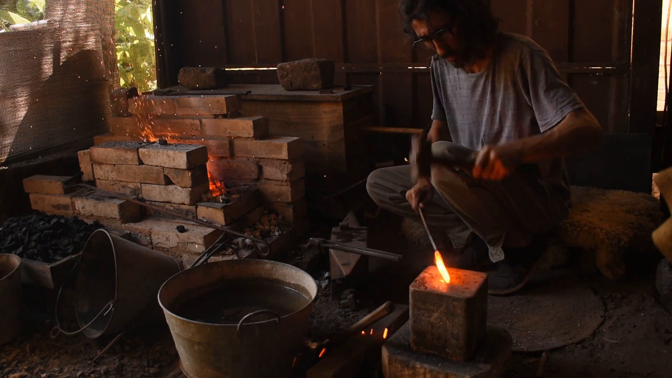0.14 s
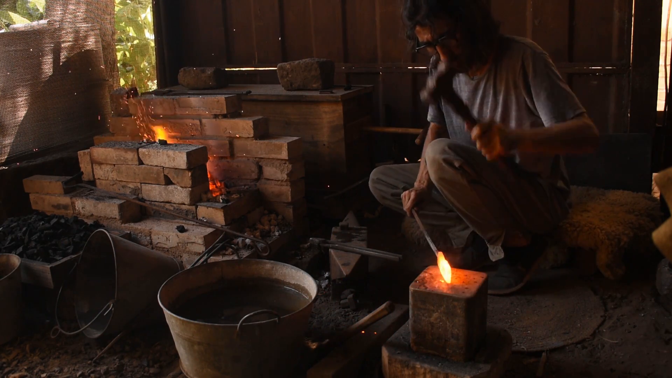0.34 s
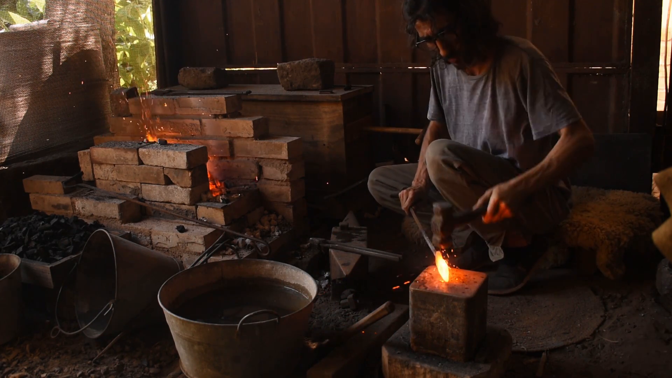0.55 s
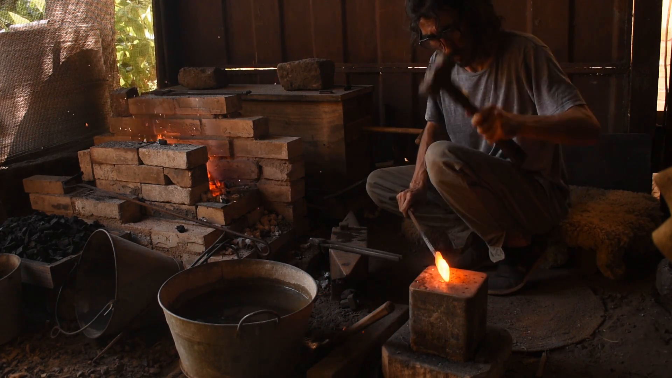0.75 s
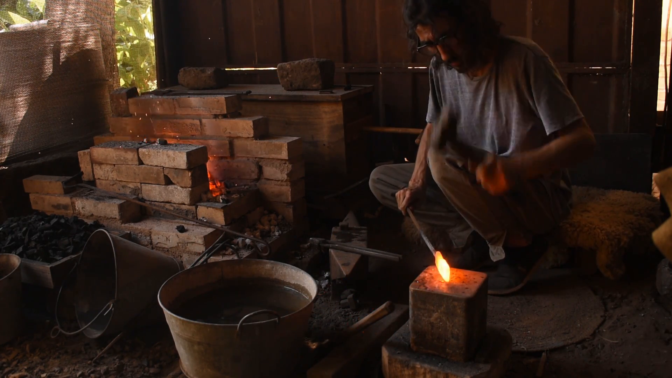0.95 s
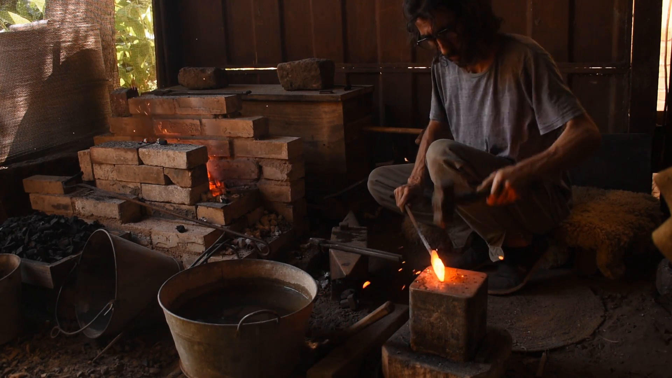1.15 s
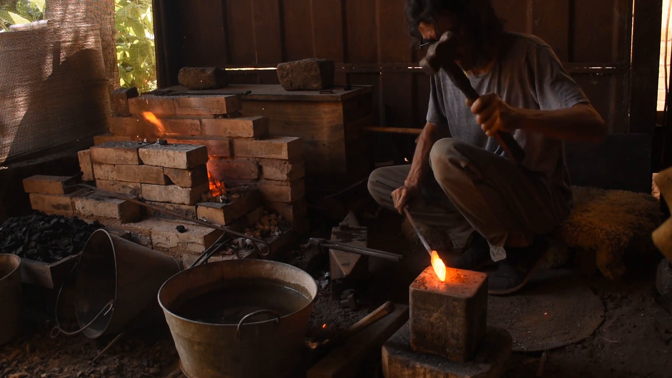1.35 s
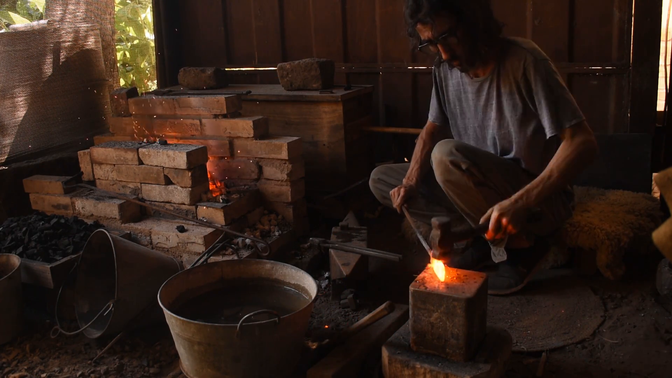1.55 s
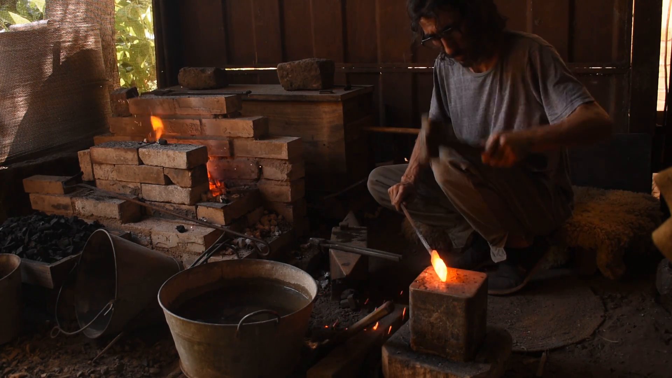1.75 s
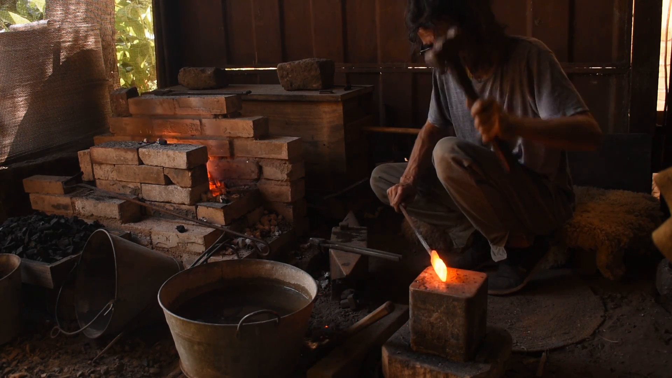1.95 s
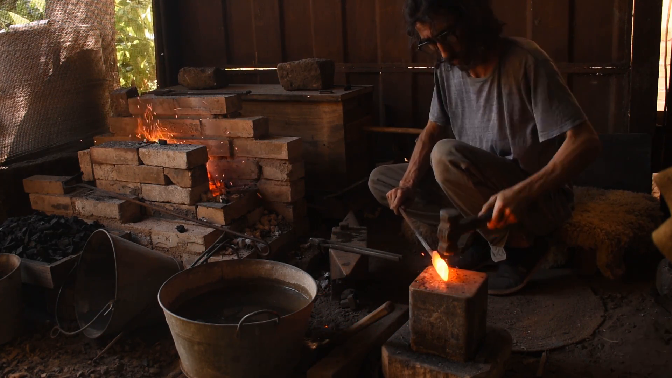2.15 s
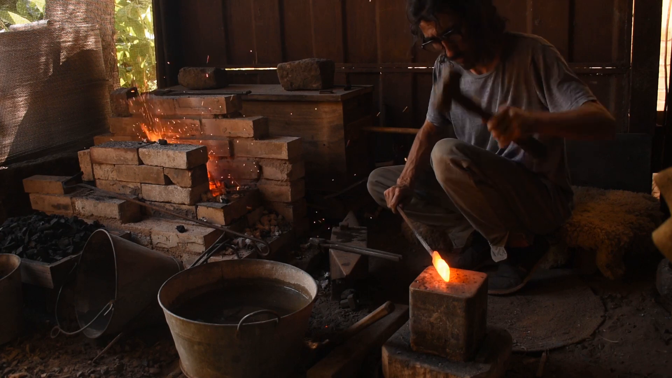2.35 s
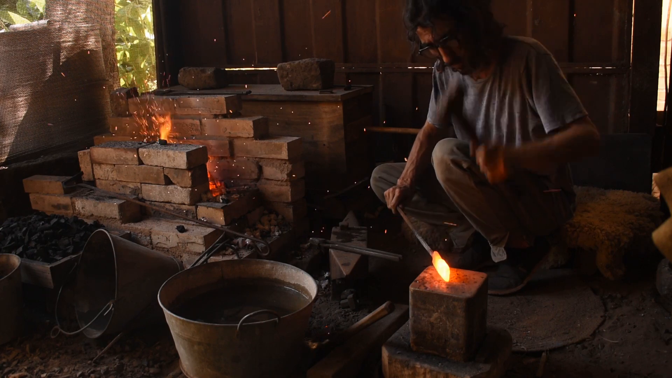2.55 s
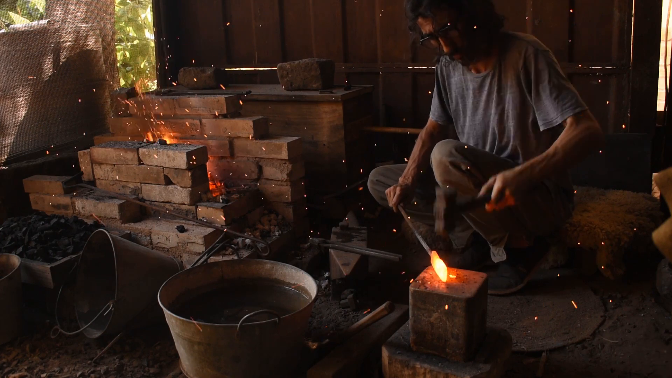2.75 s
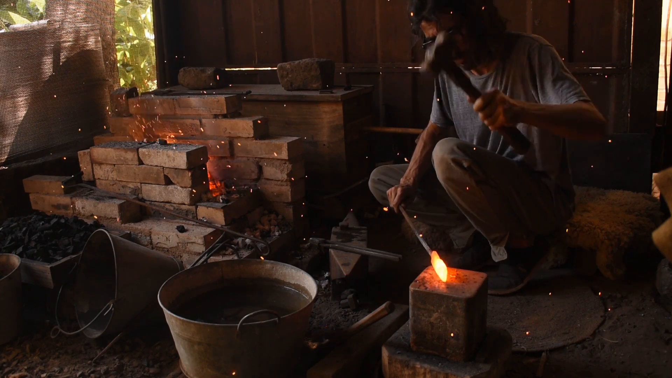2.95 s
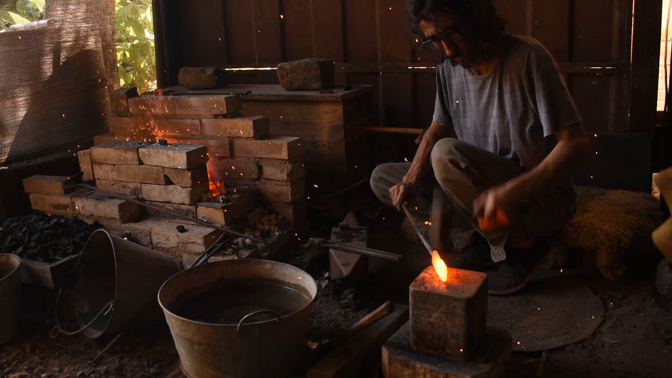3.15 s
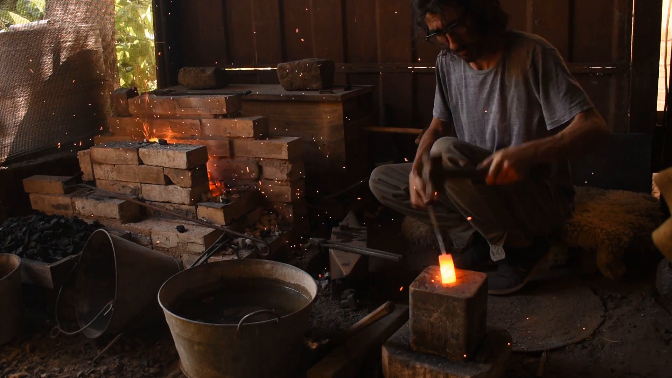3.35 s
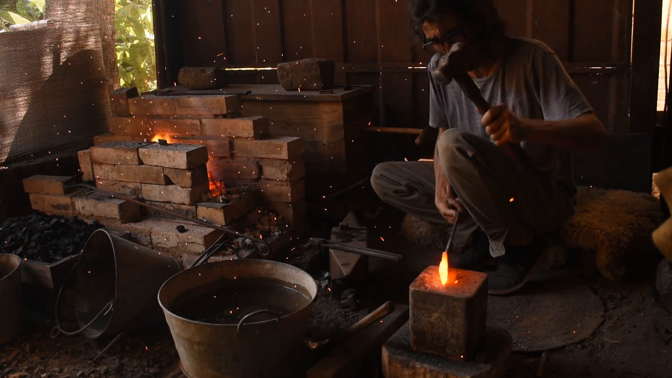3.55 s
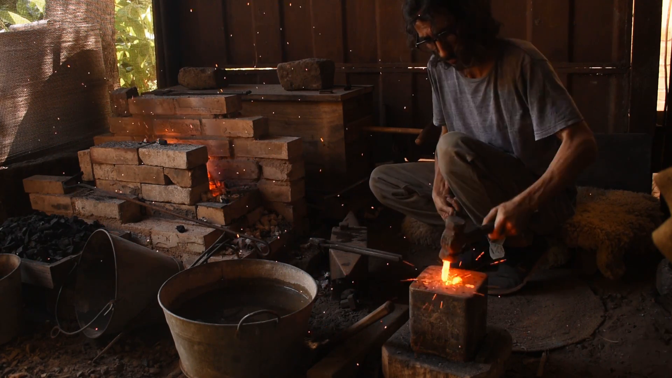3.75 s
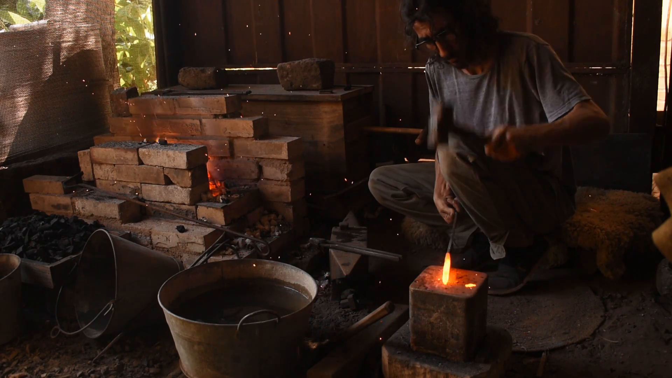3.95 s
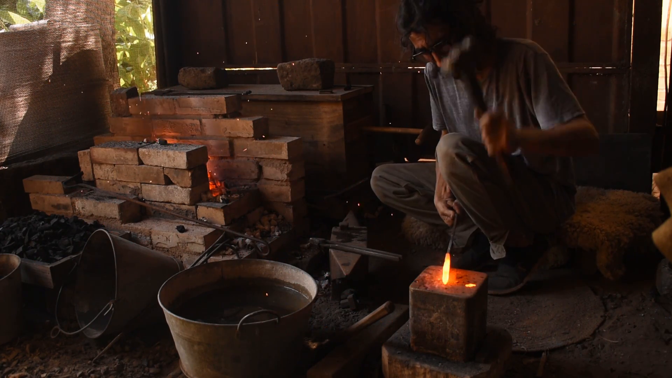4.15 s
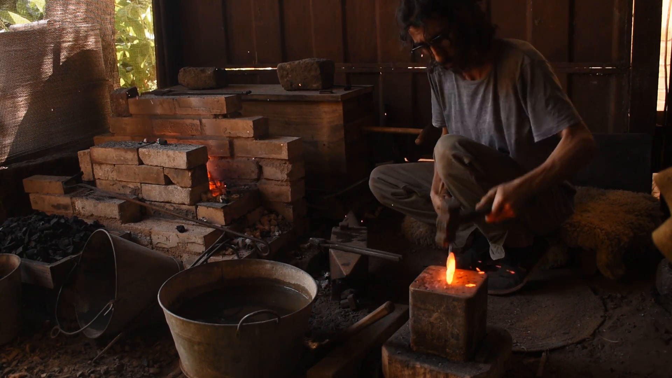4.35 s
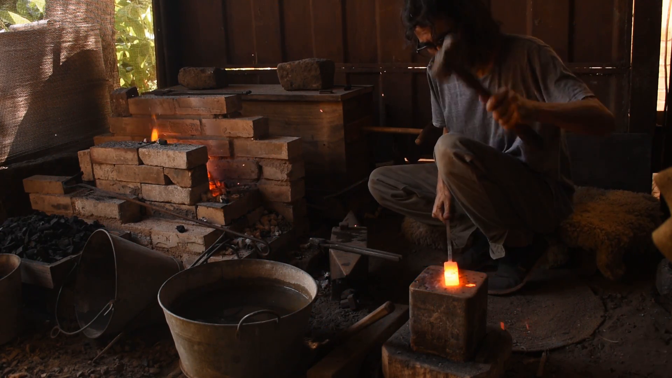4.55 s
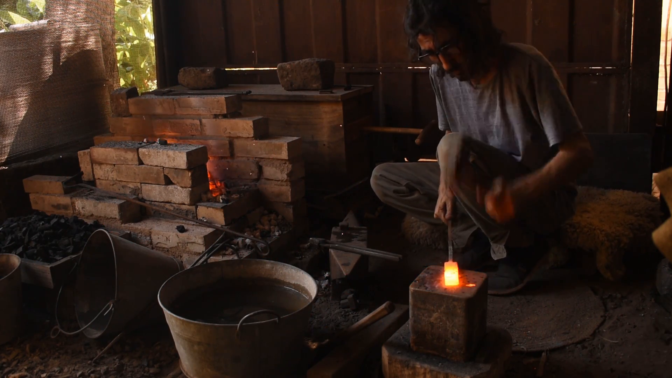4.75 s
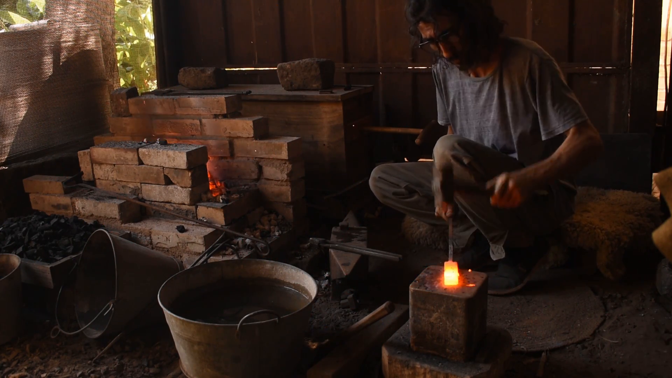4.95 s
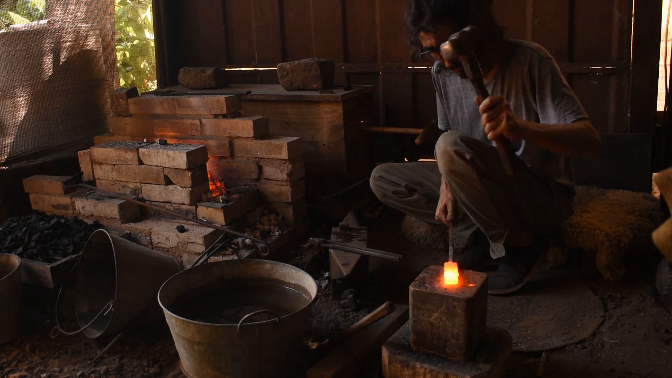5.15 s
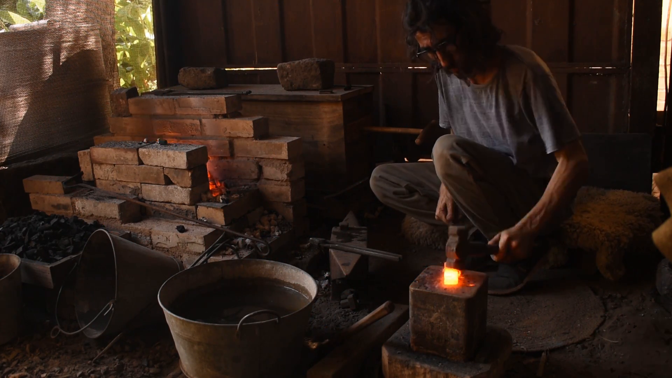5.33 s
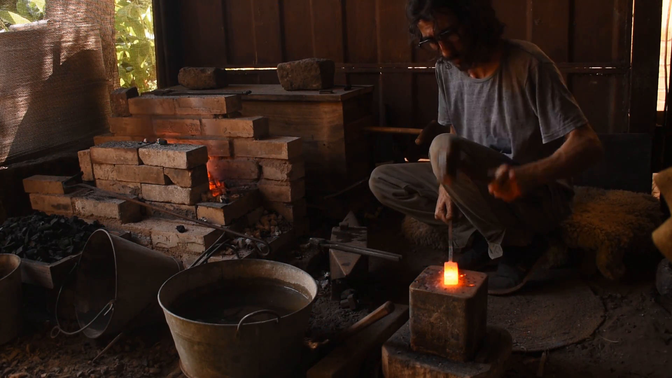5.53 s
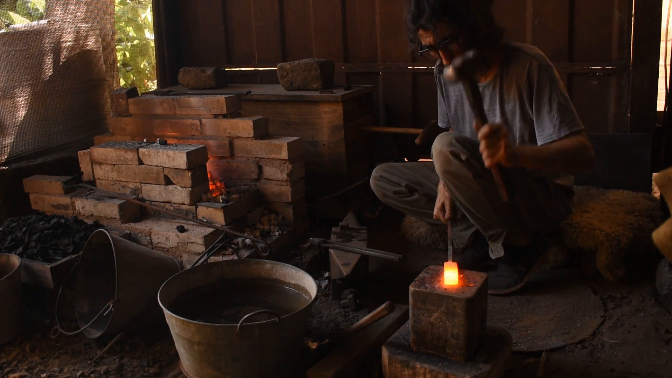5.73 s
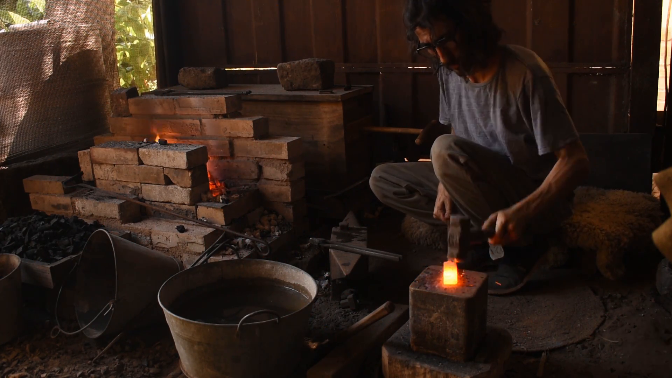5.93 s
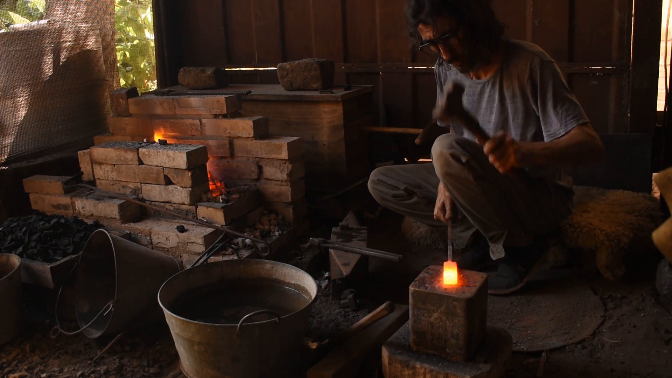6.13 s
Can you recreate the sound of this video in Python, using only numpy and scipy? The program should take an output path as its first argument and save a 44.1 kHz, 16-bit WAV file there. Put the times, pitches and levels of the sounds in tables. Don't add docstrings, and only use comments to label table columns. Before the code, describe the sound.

A hand hammer knocks hot steel on a small anvil block about twice a second in a wooden shed, while charcoal crackles and pops nearby.

```python
import sys
import numpy as np
from scipy import signal
from scipy.fft import rfft, irfft
from scipy.io import wavfile

SR = 44100
rng = np.random.default_rng(int(sys.argv[2]) if len(sys.argv) > 2 else 0)


def pcm_store(signal):
    levels = np.round(np.clip(np.atleast_2d(signal), -1, 1) * 32767)
    wavfile.write(sys.argv[1], SR, levels.astype(np.int16).T)


def rack_gain(trim_db):
    fader = np.asarray(trim_db, float)
    return 10 ** (fader / 20)


N = 272971

# t/s, knock/dB per Hz, clack/dB per Hz, face-on-face zing/dB per Hz,
# note of the bar as it shortens and turns f/Hz
BLOWS = [(0.0006, 18, 10, 12, 3870), (0.5533, 13, 1, -34, 5400), (1.1050, 21, 4, 3, 4730),
         (1.632, 21.5, 11.5, 9.5, 3510), (2.167, 23, 4.5, 6.5, 3400), (2.714, 24, 2, 16, 3500),
         (3.2556, 22.5, 5, 7, 3500), (3.809, 11, 9.5, 5, 2590), (4.3475, 23.5, 8.5, 2.5, 2276),
         (4.884, 22, 11.5, -11.5, 2720), (5.414, 24, 12, 20, 3180), (5.953, 26, 16, 24, 3420)]


def rms_one(x):
    return x / np.sqrt(np.mean(x ** 2) + 1e-30)


def at_hz(points, hz):
    table_hz, values = np.transpose(points)
    return np.interp(np.log(hz), np.log(table_hz), values)


def band_pass(x, band_hz):
    return signal.sosfilt(signal.butter(2, band_hz, "band", fs=SR, output="sos"), x)


def clicks(times, levels_db):
    out = np.full(N, 1e-18)
    places = np.round(np.asarray(times) * SR).astype(int)
    out[np.clip(places, 0, N - 1)] = rack_gain(levels_db)
    return out


def ring(x, hz, t60):
    r, w = rack_gain(-60 / (t60 * SR)), 2 * np.pi * hz / SR
    return signal.lfilter([0, np.sin(w)], [1, -2 * r * np.cos(w), r * r], x)


def contacts(times, levels_db, band_hz, contact_s, rough):
    length = 900
    t = np.arange(length) / SR
    click = (t == 0) * 1.0
    aftermath = rng.standard_normal((len(times), length)) * np.exp(-t / contact_s)
    bursts = band_pass(click + rough * aftermath, band_hz)
    click_energy = np.sum(band_pass(click, band_hz) ** 2)
    bursts *= np.sqrt(click_energy / np.sum(bursts ** 2, axis=1, keepdims=True))
    out = np.full(N + length, 1e-18)
    for s, db, burst in zip(times, levels_db, bursts):
        i = max(round(s * SR), 0)
        out[i:i + length] += rack_gain(db) * burst
    return out[:N]


def shed(x, echoes, tail_db, rise_s):
    # f/Hz, t60/s
    shed_t60 = [(60, 0.22), (120, 0.88), (260, 0.33), (700, 0.27), (1800, 0.28), (4800, 0.21), (9000, 0.18),
                (14000, 0.072)]
    linger_db = -31
    t = np.arange(SR) / SR
    white = rng.standard_normal((2, SR))
    edges_hz = 50 * 2 ** np.arange(0, 8.6, .5)
    tail = 0
    for k, (low, high) in enumerate(zip(edges_hz, edges_hz[1:])):
        fall_db = -60 * t / at_hz(shed_t60, np.sqrt(low * high))
        decay = rack_gain(fall_db) + rack_gain(linger_db + 0.32 * fall_db)
        tail = tail + band_pass(white[k % 2], [low, high]) * decay
    response = rack_gain(tail_db) * tail * (1 - np.exp(-t / rise_s))
    response[0] += 1
    for s, db in echoes:
        response[round(s * SR)] += rack_gain(db)
    return signal.fftconvolve(x, response)[:N]


def air():
    # f/Hz, level/dB per Hz
    air_colour = [(25, -32.5), (80, -14), (240, 0.5), (700, 3), (2500, -3), (4000, -13.5), (7000, -13.5),
                  (10000, -28.5)]
    hz = np.maximum(np.fft.rfftfreq(N, 1 / SR), 1)
    spectrum = rfft(rng.standard_normal(N)) * rack_gain(at_hz(air_colour, hz))
    return rack_gain(-71.5) * rms_one(irfft(spectrum, N))


def birds():
    # t/s, length/s, first f/Hz, middle f/Hz, last f/Hz
    bird_calls = [
        (.37, .08, 4900, 5020, 4650),
        (.72, .11, 4250, 4550, 5050),
        (4.54, .06, 5700, 5750, 5680),
        (5.12, .06, 5700, 5780, 5800),
        (5.71, .09, 5750, 5700, 5800),
        (5.72, .12, 3650, 4450, 4120),
        (5.84, .09, 4200, 4100, 3870),
        (5.91, .05, 5850, 5720, 5750),
    ]
    t, out = np.arange(N) / SR, 0
    for start, length, first_hz, middle_hz, last_hz in bird_calls:
        u = np.clip((t - start) / length, 0, 1)
        bow_hz = (2 * middle_hz - first_hz - last_hz) * 2 * u * (1 - u)
        hz = first_hz + (last_hz - first_hz) * u + bow_hz
        out = out + np.sin(np.pi * u) * np.sin(2 * np.pi * np.cumsum(hz) / SR)
    flutter = signal.lfilter([1], [1, -1.99, .990025], rng.standard_normal(N))
    return rack_gain(-78.5) * out * (.8 + .3 * rms_one(flutter))


def charcoal():
    # t/s, peak level/dB, low part against the top/dB
    lump_pops = [(0.2363, -19, -9), (0.6456, -28, -7), (1.339, -32, -21), (1.5114, -35, -2.5),
                 (2.0402, -9, -9.5), (2.3805, -28, -7), (2.4595, -42, -1), (2.522, -14.5, -10.5),
                 (2.596, -36, -4), (2.654, -30.5, -9.5), (2.9884, -30, -11.5), (3.0147, -28.5, -6.5),
                 (3.048, -33, -0.5), (3.2449, -26.5, 4.5), (3.3358, -32, -21), (3.4624, -22, -7.5),
                 (3.4967, -34.5, 1), (3.768, -27.5, -10)]
    # t/s, peak level/dB
    more_pops = [(0.195, -35.5), (0.368, -38), (0.464, -46), (0.931, -44.5), (0.9788, -42.5),
                 (1.039, -40), (1.068, -41), (1.4294, -38.5), (1.444, -37), (1.555, -42), (2.3484, -67.5),
                 (2.403, -38.5), (2.421, -36), (2.6778, -32.5), (2.8597, -37.5), (2.9562, -35),
                 (3.0805, -35), (3.1161, -33.5), (3.1948, -38.5), (3.4032, -30), (3.594, -37),
                 (3.6253, -38), (4.061, -41.5), (4.15, -81), (4.1615, -36), (4.193, -39), (4.2617, -39.5),
                 (4.337, -47), (4.5632, -47.5), (4.7112, -56.5)]
    # low f/Hz, high f/Hz
    pop_bands = [
        (650, 3300),
        (3500, 11000),
    ]
    # t/s, level/dB
    draught = [(0, -65), (1.6, -84), (1.75, -96), (2.05, -107), (2.25, -55), (3.1, -62), (3.6, -63.5),
               (3.75, -75), (4.3, -73.5), (4.5, -79.5), (6.19, -108.5)]
    more_pops_low_db = -7
    cracks_per_s, crack_spread_db = 90, 5

    events = lump_pops + [(s, db, more_pops_low_db) for s, db in more_pops]
    s, top_db, low_db = np.transpose(events)
    low = contacts(s, top_db + low_db + 6.0, pop_bands[0], contact_s=0.00013, rough=.15)
    top = contacts(s, top_db + 8.5, pop_bands[1], contact_s=0.0003, rough=0.2)

    sizes = rack_gain(crack_spread_db * np.minimum(rng.exponential(1, N), 3)) * rng.choice([-1, 1], N)
    cracks = sizes * (rng.random(N) < cracks_per_s / SR)
    cracks = rms_one(band_pass(cracks, [3000, 11500]))
    sizzle_db = np.interp(np.arange(N) / SR, *np.transpose(draught)) - 5.5
    return top - low + cracks * rack_gain(sizzle_db)


def block():
    # f/Hz, level at a mean knock/dB, t60/s
    block_modes = [(496, -33.5, .15), (605, -38, .13), (895, -38, .12), (1280, -35, .1), (1390, -39, .1),
                   (1508, -28.5, .16), (1616, -31.5, .14), (1698, -32, .14), (1780, -30.5, .14)]
    mean_knock_db = 20
    s, knock = np.transpose(BLOWS)[:2]
    out = 0
    for k, (hz, db, t60) in enumerate(block_modes):
        struck = clicks(s, db + min(hz / 1600, 1) * (knock - mean_knock_db))
        swelling = ring(struck, hz, t60) - ring(struck, hz, t60=.015)
        out = out + (-1) ** k * swelling
    return out


def bar():
    s, _, clack, zing_db, note_hz = np.transpose(BLOWS)
    note = 0
    for at, db, hz in zip(s, -40 + 1.05 * clack, note_hz):
        note = note + ring(clicks([at], [db]), hz, t60=0.033)
    scale_db = -12.5 + 0.93 * zing_db - 14.0
    return note + contacts(s, scale_db, (9600, 14500), contact_s=0.00086, rough=0.067)


def hammer_head():
    # t/s, bending mode/dB, its twin across the face against it/dB,
    # upper mode/dB, its twin against it/dB
    head_ringing = [(0, -42.5, -12, -45, -10), (0.553, -48, -5, -40.5, -10), (1.105, -37, -10, -43.5, -11),
                    (1.631, -27.5, -11.5, -37.5, 0), (2.166, -35, -11, -43.5, -3),
                    (2.713, -35, -3, -37.5, -3), (3.254, -50, 4.5, -45.5, -7),
                    (3.808, -57, -5, -57.5, -8.5), (4.346, -41.5, -18.5, -49.5, -2.5),
                    (4.884, -47, -14.5, -49, -2), (5.414, -35.5, -8.5, -59, 12.5),
                    (5.953, -38, -4.5, -44.5, 1.5)]
    head_hz = [7596, 7687, 10122, 10897, 11610, 6309, 10690, 13140, 14840]
    head_t60 = [.55, .37, .62, .4, .6, .49, .45, .5, .2]
    weak_db = [-19, -6, -21, -22, -24]
    grip_shift = [-2.8, -1.8, -.4, -.3, -1.2]
    weak_spread_db = 2.5

    s, bend, twin, upper, upper_twin = np.transpose(head_ringing)
    levels = [bend + twin, bend, upper, upper + upper_twin]
    for db, shift in zip(weak_db, grip_shift):
        chance = weak_spread_db * rng.standard_normal(len(s))
        levels.append(upper + np.maximum(upper_twin, -4) + db + shift * s + chance)
    strike_s = np.transpose(BLOWS)[0]
    out = 0
    for db, hz, t60 in zip(levels, head_hz, head_t60):
        struck = clicks(strike_s, db)
        swelling = ring(struck, hz, t60) - ring(struck, hz, t60=0.01)
        waver_db = 1.3 * rms_one(signal.lfilter([1], [1, -1.996, .996004], rng.standard_normal(N)))
        out = out + swelling * rack_gain(waver_db)
    return out


def blows():
    # low f/Hz, high f/Hz
    blow_bands = [
        (300, 800),
        (1050, 1950),
        (2150, 4000),
        (4200, 7100),
        (7400, 9000),
    ]
    strike_grit = [.005, .015, .06, .1]
    s, knock, clack, zing_db, _ = np.transpose(BLOWS)
    thud = 11 + 0.16 * knock
    tick = 10 + 0.55 * s
    body = 0
    for k, (db, band, grit) in enumerate(zip([thud, knock, clack, tick], blow_bands, strike_grit)):
        trim_db = 13 if k == 1 else 8.5
        body = body + (-1) ** k * contacts(s, db - trim_db, band, contact_s=0.0039, rough=grit)
    zing = contacts(s, zing_db - 8.5, blow_bands[4], contact_s=0.0033, rough=0.067)
    lag = round(.0068 * SR)
    roof = np.concatenate([np.zeros(lag), zing[:-lag]])
    stump = contacts(s + 0.0013, thud - 23, (60, 230), contact_s=0.0017, rough=0.03)
    return body + .3 * zing + roof + stump


def scene():
    # t/s, level/dB
    anvil_echoes = [(.0011, -5.5), (.0029, -4.5), (.0068, -3), (.0113, -9.5)]
    # t/s, level/dB
    hearth_echoes = [(.0008, -11), (.0050, -4), (.0097, -10.5)]
    mic_low_hz, mic_top_hz = 162, 11100
    background = air() + birds()
    hearth = shed(charcoal(), hearth_echoes, tail_db=-27.5, rise_s=0.0016)
    anvil = shed(bar() + blows(), anvil_echoes, tail_db=-23.5, rise_s=0.00035)
    near = hearth + block() + anvil
    near = signal.sosfilt(signal.butter(1, mic_low_hz, "high", fs=SR, output="sos"), near)
    near = signal.sosfilt(signal.butter(2, mic_top_hz, fs=SR, output="sos"), near)
    return (background + near + hammer_head())[None]


def top_cut(x):
    return signal.sosfilt(signal.butter(12, 16550, fs=SR, output="sos"), x)


def record(dry):
    mix = signal.sosfilt(signal.cheby2(10, 50, 16700, fs=SR, output="sos"), dry)
    return top_cut(mix)


dry = scene()
out = record(dry)
pcm_store(out)
```